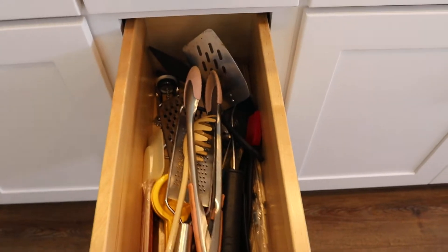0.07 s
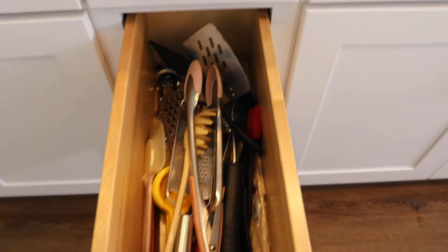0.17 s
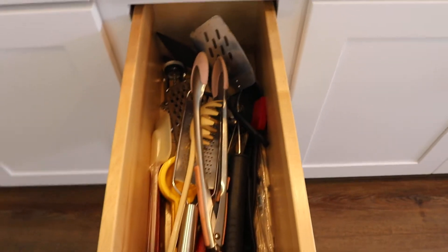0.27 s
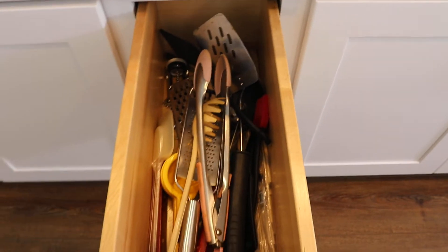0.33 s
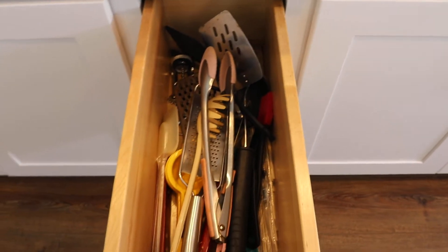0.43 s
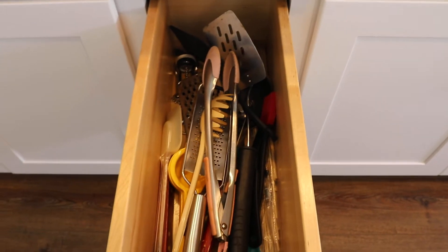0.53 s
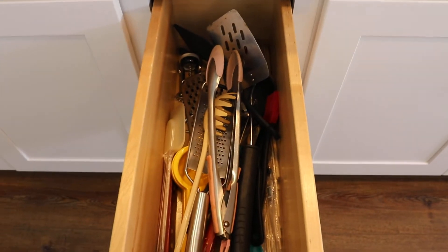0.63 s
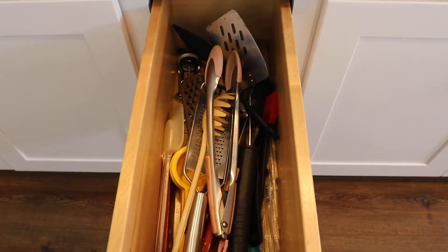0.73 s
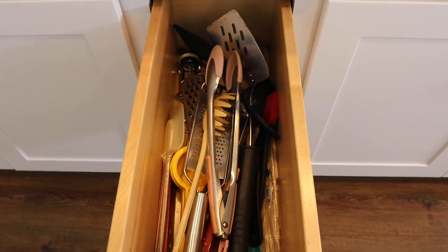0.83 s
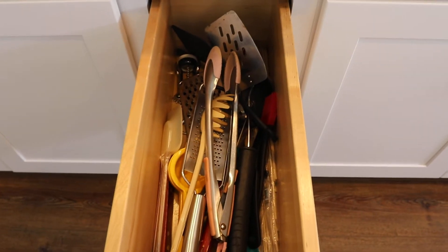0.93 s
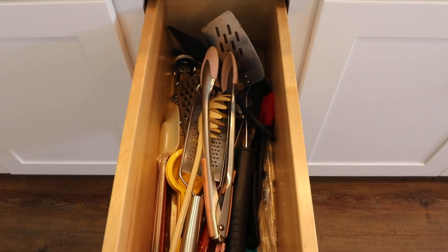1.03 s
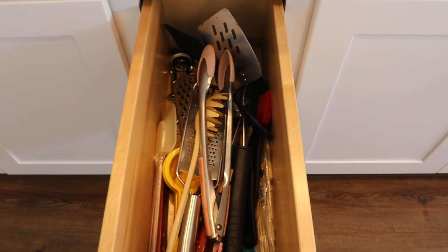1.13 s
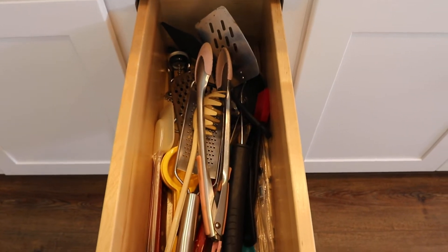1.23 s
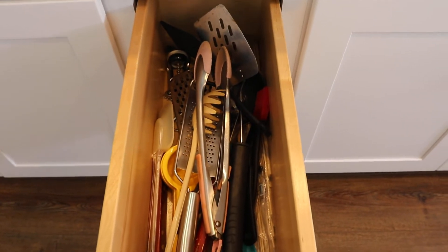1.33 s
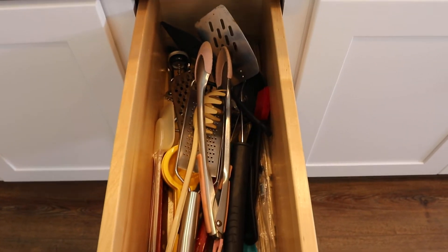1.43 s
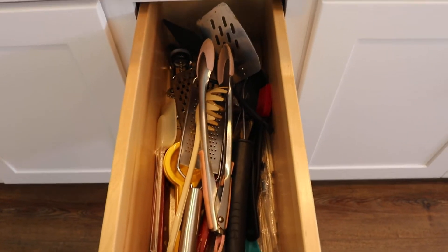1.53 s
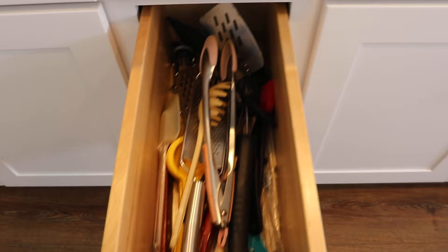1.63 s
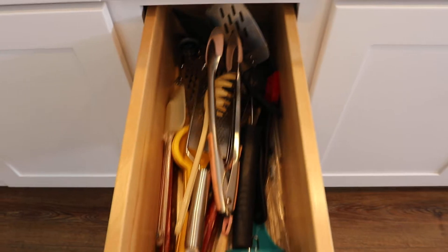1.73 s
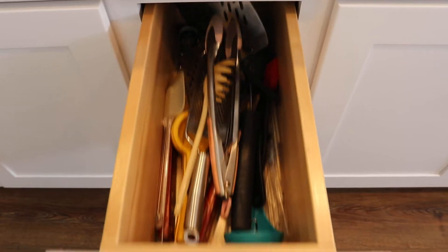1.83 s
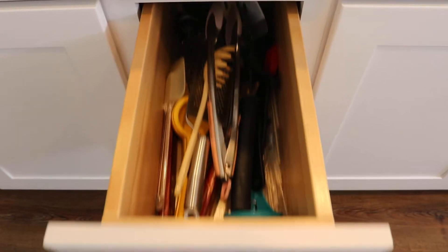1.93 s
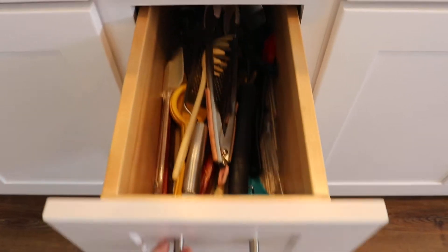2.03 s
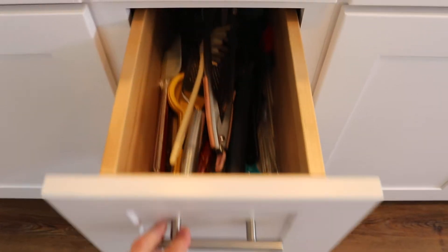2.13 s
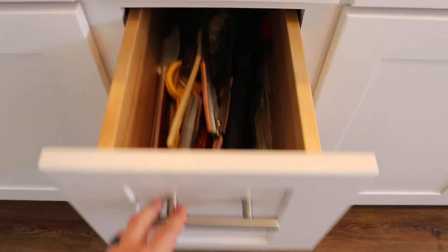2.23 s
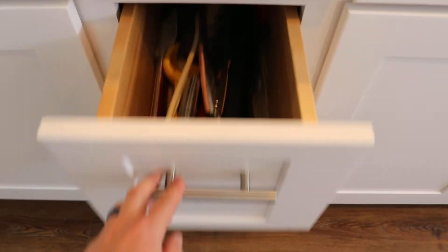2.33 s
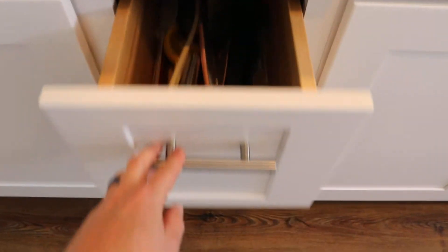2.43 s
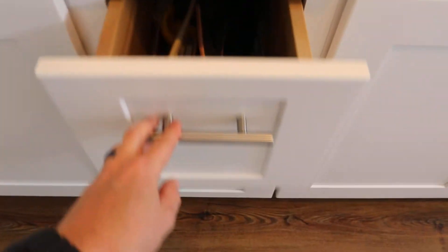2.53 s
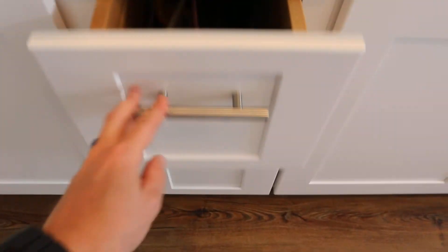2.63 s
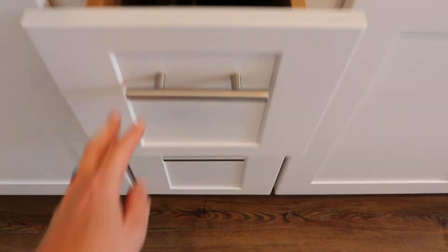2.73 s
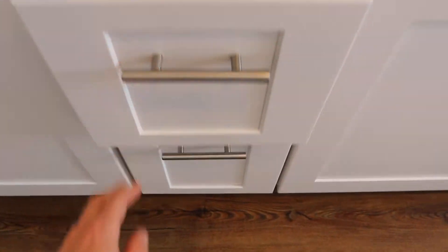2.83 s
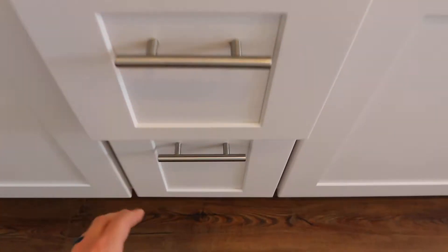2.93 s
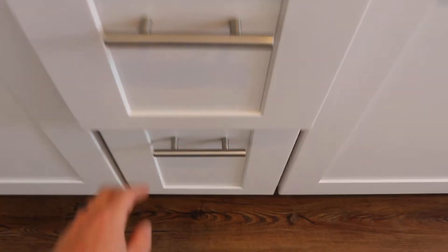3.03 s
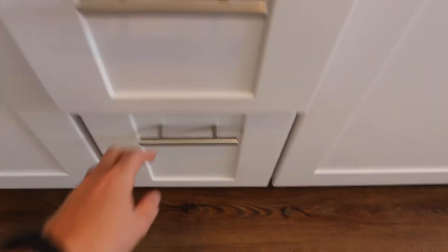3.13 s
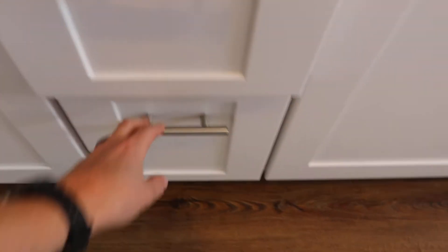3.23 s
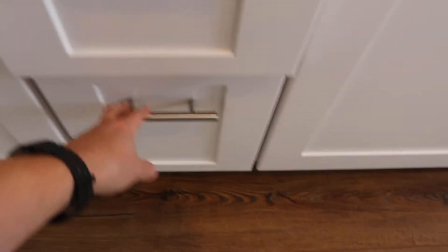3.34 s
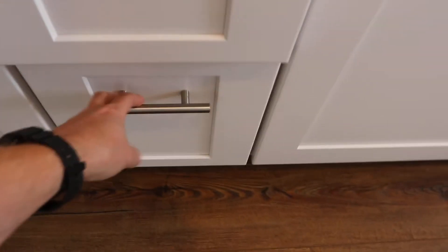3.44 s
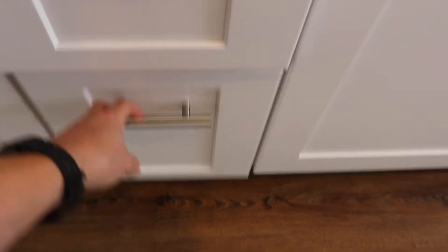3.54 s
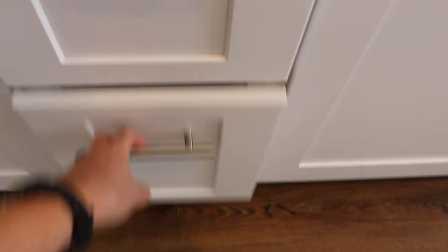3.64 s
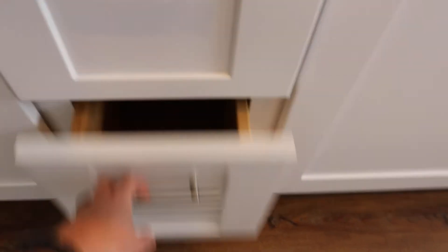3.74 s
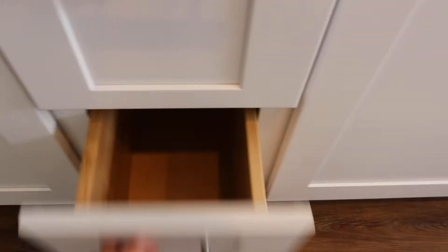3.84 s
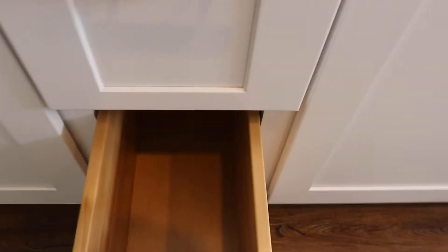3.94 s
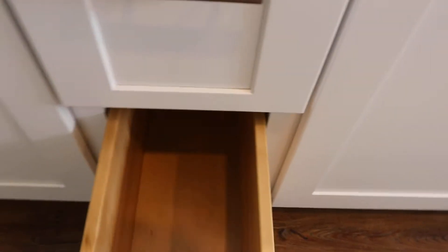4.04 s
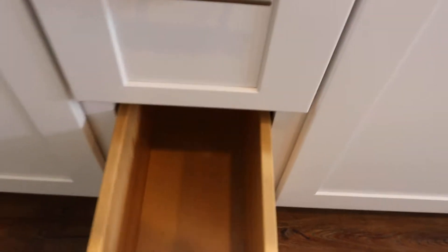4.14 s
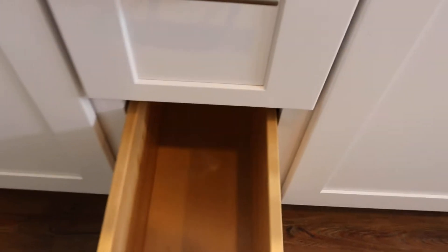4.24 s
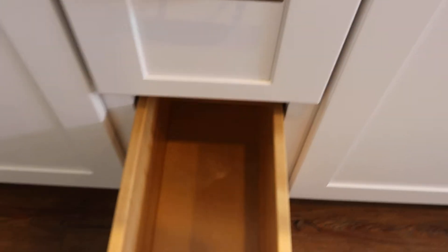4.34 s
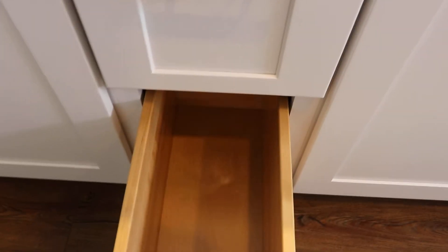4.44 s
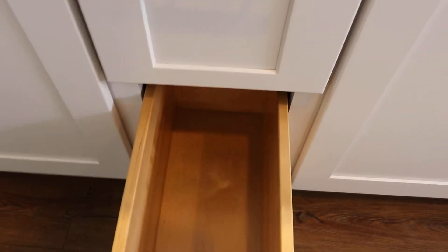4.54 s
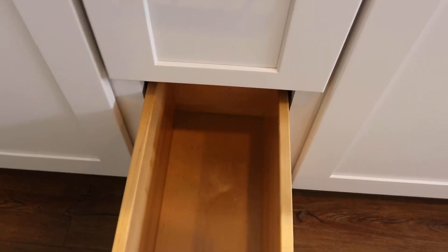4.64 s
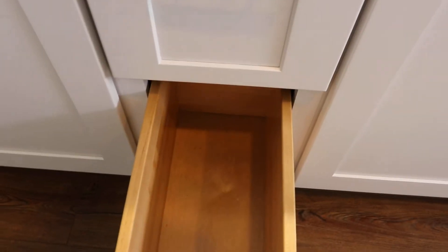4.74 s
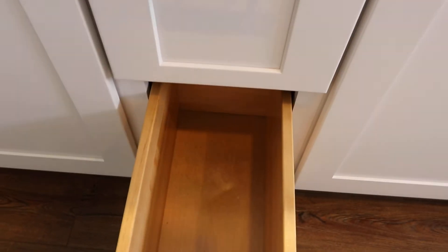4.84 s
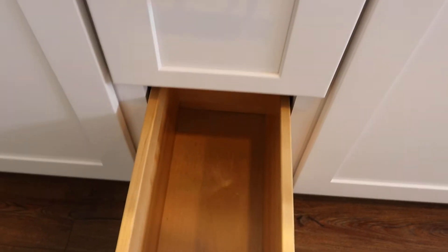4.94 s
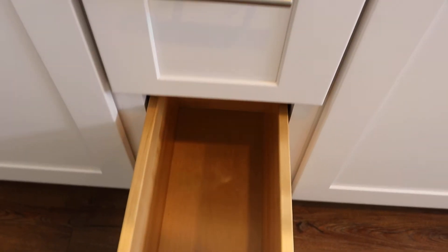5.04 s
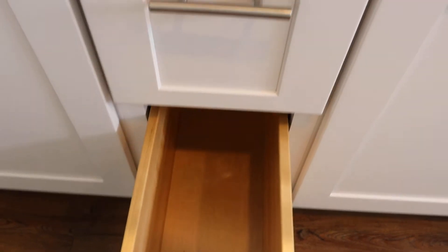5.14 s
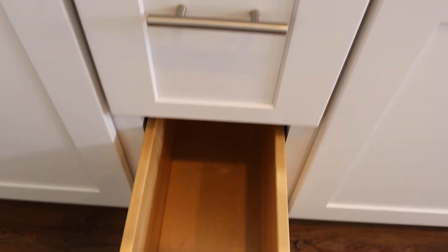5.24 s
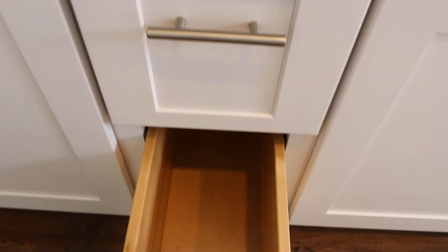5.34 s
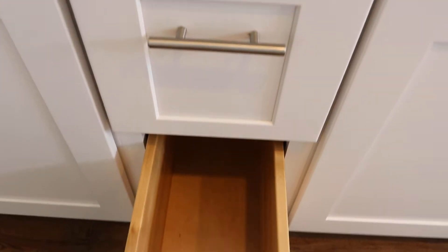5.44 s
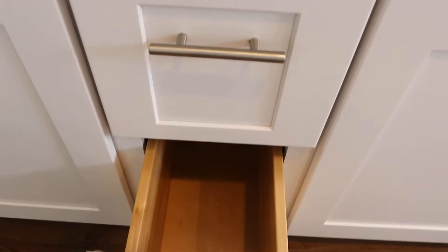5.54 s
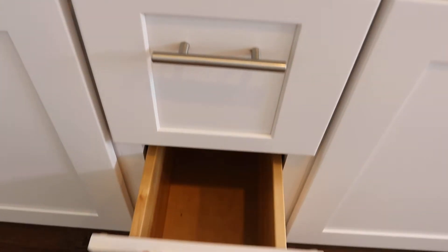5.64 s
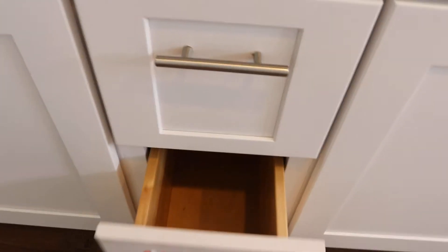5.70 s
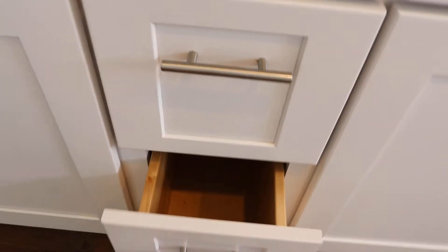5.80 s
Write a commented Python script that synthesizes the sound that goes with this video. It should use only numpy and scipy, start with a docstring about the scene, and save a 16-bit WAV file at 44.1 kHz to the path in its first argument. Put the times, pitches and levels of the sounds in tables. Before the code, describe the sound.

A quiet kitchen with low room tone, faint fridge and motor hum, soft microphone hiss and slight handling rumble, stronger on the left. At about 0.55-0.8 s, a cluster of small dull taps on wood. From around 1.5 s a full utensil drawer starts rolling on ball runners; from 1.9 to 2.3 s it rattles, with light metallic clinks, then glides more softly and latches with a sharp, dry click near 2.97 s. The fridge hum thins out here. Tiny hard ticks of hand and handle follow at 3.1-3.5 s, with a small low thud. At 3.6 s the empty lower drawer is pulled quickly: louder, hollow rumble and bright rail hiss, clacking at 3.75 s and peaking at 3.9-4.05 s with deep thuds at the stop. Boxy resonance and faint ticks fade by 4.8 s. From 5 s it rolls back, with boomy swells around 5.25 and 5.4 s, softening toward the end.

```python
"""Two wooden kitchen drawers roll on steel ball runners. The upper one, full of utensils, is pushed shut
and latches. The empty lower one is pulled out, bumps its stop and is pushed back. Random knocks of balls on
a rough track shake the wood and make the rails rattle and hiss. Small parts click as short bursts through
resonances; short low tones add a few deep thuds and brief swells of the box boom. Behind them a fridge and
motor tones hum in a quiet kitchen of shaped noise, with microphone hiss and the low rumble of the hand."""
import sys
import numpy as np
from scipy import signal
from scipy.fft import rfft, irfft
from scipy.io import wavfile
from scipy.ndimage import uniform_filter1d

SR = 44100
rng = np.random.default_rng(int(sys.argv[2]) if len(sys.argv) > 2 else 0)


def master_out(mix):
    """Clip the mix to full scale and print it as 16-bit PCM to the path in sys.argv[1]."""
    frames = np.transpose(np.atleast_2d(mix))
    ceiling = np.clip(frames, -1, 1)
    pcm = np.round(ceiling * 32767).astype(np.int16)
    wavfile.write(sys.argv[1], SR, pcm)


N = 258854

# How each drawer rolls. Each row: time in seconds, then levels in dB of the box boom, rail noise, treble hiss.
UPPER_ROLL = [(1.3, -56.5, -69, -72), (1.51, -45.5, -55, -66), (1.76, -38, -43, -59),
              (1.88, -27.5, -41.5, -62), (2.04, -31, -37.5, -51), (2.15, -35, -50, -63),
              (2.4, -38, -49.5, -55.5), (2.56, -40.5, -45, -50), (2.75, -42, -50.5, -56),
              (2.86, -43, -53, -59), (2.97, -32.5, -54.5, -58.5), (3.15, -47, -55.5, -56),
              (3.4, -42.5, -57, -56.5), (3.56, -41.5, -48, -59)]
LOWER_ROLL = [(3.56, -52, -53, -60), (3.66, -38.5, -41.5, -56), (3.74, -31.5, -36.5, -48),
              (3.8, -21.5, -31.5, -55), (3.89, -23, -29, -40.5), (3.93, -21.5, -25.5, -35),
              (3.99, -23, -40, -45), (4.03, -17.5, -38.5, -48), (4.1, -26, -38.5, -49),
              (4.22, -26, -48.5, -56.5), (4.47, -29, -55, -62), (4.61, -36, -67, -64),
              (4.81, -48, -65, -75), (4.92, -44.5, -56, -65), (4.99, -28.5, -47.5, -61),
              (5.13, -28, -39.5, -60), (5.2, -29.5, -42, -57), (5.26, -19, -39, -61),
              (5.34, -25.5, -36, -58), (5.41, -17, -39.5, -62), (5.46, -24.5, -48.5, -60),
              (5.55, -33.5, -44.5, -59), (5.69, -32, -48.5, -63), (5.87, -36, -60.5, -68)]
# Resonances of the drawers' parts. Each row: pitch in Hz, width in Hz, level in dB next to the other rows.
# Air and bottom panel of each box:
FULL_BOX_MODES = [(235, 31.6, 1.5), (250.6, 14.2, 5.5), (294.4, 8.9, 6.5)]
EMPTY_BOX_MODES = [(216, 11.4, -1.5), (244.2, 18.9, -1.5), (273.5, 11.2, -0.5)]
# Steel rails:
FULL_RAIL_MODES = [(656, 160, -6.5), (812, 110, 0.5), (928, 49, 1), (1073, 89, -4.5), (1217, 120, 2),
                   (1334, 200, -7), (1470, 74, -1.5), (1670, 300, -6.5)]
EMPTY_RAIL_MODES = [(677, 49, -4.5), (771, 43, -1.5), (820, 22, 2), (947, 23, -1), (1095, 280, -11),
                    (1227, 55, -1.5), (1316, 54, -6.5), (1478, 46, -4.5), (1682, 160, -9)]
# Cages that hold the balls:
FULL_CAGE_MODES = [(1960, 45, 7), (2323, 54, 8), (2570, 52, 5), (2820, 360, -2), (3150, 140, 2.5),
                   (3460, 350, -4.5), (4330, 570, -1.5), (4380, 1140, -4.5)]
EMPTY_CAGE_MODES = [(2040, 110, -0.5), (2320, 300, 3.5), (2486, 50, 9), (2710, 130, 4), (3230, 290, 0),
                    (3694, 160, -0.5), (4000, 260, -5), (5100, 860, -17.5)]
# Wooden panels, the cabinet and the balls, shared by both drawers:
PANEL_MODES = [(320, 35.7, -3), (371.7, 11.2, -6), (391.5, 5.5, 4.5), (445.3, 23.6, 1.5), (466.8, 43, -5.5),
               (527, 55, -11), (573, 17.5, -11.5)]
CABINET_MODES = [(77, 75, 3.5), (121.3, 4.7, 15.5), (171, 20, 3)]
BALL_MODES = [(6100, 3250, 21), (10000, 4200, 23), (13700, 4000, -15)]

# Clicks of utensils, latch, handle and runners. Each row: start in seconds, steel level in dB, wood level
# in dB over the steel, fizz in dB over the steel, seconds to fall by 60 dB, note of the struck part in Hz.
CLICK_LIST = [(1.899, -50.5, -4, 14, 0.09, 4600), (1.9962, -33, -4, -5, 0.035, 1330),
              (2.0073, -37.5, -2, -5, 0.16, 1140), (2.035, -43, -13, 0, 0.25, 1140),
              (2.0729, -34.5, 7.5, -0.5, 0.037, 3150), (2.081, -30.5, 3.5, -17, 0.052, 1050),
              (2.1593, -32.5, -11, -8, .055, 1320), (2.2142, -32, -17, -8, 0.055, 1365),
              (2.3168, -41.5, 3, 3.5, 0.054, 2820), (2.6377, -45, -12, -7, 0.11, 1110),
              (2.839, -42, 2, -18, 0.17, 1400), (2.9176, -37.5, 16, -39, 0.043, 780),
              (2.924, -44, 10, -38, 0.088, 1060), (2.9638, -32, 3.5, -13, 0.079, 1010),
              (2.9727, -23.5, -3, -36, 0.021, 1660), (2.9755, -35.5, 8, -28, 0.051, 2580),
              (3.3706, -40.5, 6.5, -11, 0.062, 1300), (3.5084, -30.5, 0.5, -14.5, 0.11, 1260),
              (3.6304, -38.5, -4, -7.5, 0.3, 1390), (3.701, -34.5, 2, -11, 0.19, 1190),
              (3.7522, -23, -3, -28, 0.057, 2230), (3.758, -22.5, -15, -34, 0.041, 1370),
              (3.8756, -37, -11, 4, 0.22, 1740), (3.91, -23.5, 5.5, 1.5, .051, 3030),
              (3.9248, -30.5, -23, 3, 0.054, 940), (4.014, -35.5, 5, -5, 0.055, 2600),
              (4.0265, -28, 3, -14.5, 0.098, 1276), (4.287, -37, -21, -20, 0.038, 3680),
              (4.3807, -33.5, -22, -11, .075, 3660), (5.3625, -40, -6, -9, 0.076, 3680),
              (5.3804, -41, 0, -1, 0.23, 2650), (5.4021, -42, -4, -8, 0.088, 2530)]
# Resonances of wood, steel and thin steel in a click. Each row: pitch in Hz, width in Hz, level in dB.
CLICK_WOOD_MODES = [(773, 174, 0), (986, 114, 4), (1034, 51, 7), (1344, 180, 1.5)]
CLICK_STEEL_MODES = [(1720, 230, 2), (2187, 200, 9.1), (2490, 370, 0.55), (2465, 197, 10.4),
                     (2520, 370, 2.4)]
THIN_STEEL_MODES = [(2910, 73, 6.5), (3630, 125, 5.5), (4250, 440, -4.5), (5150, 690, -1),
                    (6100, 1800, -13)]

# Single dry contacts, soft taps on wood first, then needle-sharp ticks.
# Each row: start in seconds, edge level in dB, wood level in dB, seconds for the wood to fall by 60 dB.
TICK_LIST = [(.553, -40.5, -27.5, 0.2), (0.589, -46, -31, 0.1), (0.653, -46, -25.5, 0.17),
             (.669, -54, -28.5, .06), (.680, -46, -28, 0.094), (0.7521, -42, -24.5, 0.091),
             (.770, -52, -38, 0.053), (.782, -48, -29, 0.099), (3.1423, -27.5, -26.5, 0.033),
             (3.321, -33, -29, .03), (3.364, -36, -31, .02), (3.4532, -28.5, -27, 0.028)]
# Resonances of the hard edge and the wood under it. Each row: pitch in Hz, width in Hz, level in dB.
TICK_EDGE_MODES = [(1920, 1400, 1), (3160, 1350, 7), (4950, 3700, -9.5), (9000, 3600, -13)]
TICK_WOOD_MODES = [(580, 320, 8.5), (850, 240, 13), (1040, 520, 4), (1710, 700, -6.5)]

# Short low tones: a few deep thuds, and brief swells of the box boom.
# Each row: start in seconds, pitch in Hz, level in dB before the swell-in, seconds to fall by 60 dB.
LOW_TONE_LIST = [(3.383, 226, -26.5, 0.25), (3.385, 81, -35, 0.18), (3.91, 80, -23.5, 0.4),
                 (4.027, 73.4, -24.5, 0.33), (4.224, 259, -9.5, 0.098), (4.122, 251, -5, 0.089),
                 (4.44, 59.7, -29.5, 0.14), (5.407, 265, -27, 0.06)]

# Colour of the hand's rumble, the room tone and the microphone hiss.
# Each row: pitch in Hz, strength in dB next to the other rows.
GRIP_COLOUR = [(15, -18), (28, 2), (50, -14), (85, -6), (200, -60)]
KITCHEN_COLOUR = [(8.8, -45), (15, 9), (49, -16), (165, -2), (259, -6), (307, -13.5), (364, -2), (414, -1),
                  (583, -12), (1230, -16), (2500, -32), (3250, -54), (5500, -120)]
HISS_COLOUR = [(600, -32), (1500, -2.5), (2500, -3), (3500, -2.5), (5000, -9.5), (7000, -6), (10000, -6),
               (12500, -12), (15700, -17)]
# Tones of the fridge. Each row: pitch in Hz, width in Hz, level in dB before the fade below.
FRIDGE_TONES = [(185, 7.9, -50.5), (228, 5.7, -52.5), (317.3, 5.4, -42.5), (527, 3.5, -57.5),
                (7460, 25, -78)]
# The fridge drops as the microphone moves away, then comes back. Each row: time in seconds, change in dB.
FRIDGE_FADE_DB = [(0, -2.5), (1.6, -1), (2.6, -23), (5.87, -6)]
# Wandering motor tones. Each row: pitch in Hz, typical wander in Hz, level in dB before its slow swell.
MOTOR_TONES = [(58.4, 2.45, -55), (116.8, 1.01, -53.5), (417, 1.64, -53)]

# How alike left and right are, for near sounds and for the room.
# Each row: pitch in Hz, likeness from 0 (unrelated) to 1 (the same).
NEAR_ALIKE = [(20, 0.69), (100, 1), (290, .99), (640, 0.94), (1400, 0.52), (3100, 0.42), (6800, 0.15),
              (15000, 0)]
ROOM_ALIKE = [(20, 0.85), (45, 1), (130, 0.94), (290, 1), (640, 0.65), (1400, 0.29), (3100, 0), (15000, 0)]
# Left-right balance. Each row: pitch in Hz, left minus right in dB.
STEREO_LEAN = [(60, 0), (110, 1.5), (200, -0.5), (380, 0.5), (700, 0.0), (1290, -2.0), (2380, -3.5),
               (4400, -1.5), (8120, -1.0), (15000, -2.0)]

# Share of the box's dB swing that the other wooden parts follow.
PANEL_FROM_BOX, CABINET_FROM_BOX = 0.41, 0.55
# Size of the random swells in dB, and how many averaging spans fit in a second.
UNEVEN_DB, UNEVEN_PER_S = 0.76, 19
# The struck part's note: level in dB over the steel, and pitch divided by width.
NOTE_DB, NOTE_Q = -1, 26
# Thin steel rings more in the fizzier clicks: its share of the fizz dB.
THIN_FROM_FIZZ = 0.77


def drawer(roll, panel_offset_db, cabinet_offset_db, cage_offset_db, box, rails, cage):
    """Rolling grit shakes the box, the rails and the balls themselves."""
    boom_db, rail_db, ball_db = on_time(roll)
    panel_db = panel_offset_db + PANEL_FROM_BOX * boom_db + (1 - PANEL_FROM_BOX) * rail_db
    cabinet_db = cabinet_offset_db + CABINET_FROM_BOX * boom_db
    cage_db = rail_db + cage_offset_db
    # Fade in and out over 14 ms at the two ends of the movement.
    t = np.arange(N) / SR
    since_start = t - roll[0][0] + 0.0055
    until_end = roll[-1][0] + 0.015 - t
    moving = np.clip(np.minimum(since_start, until_end) / 0.014, 0, 1)
    coarse = grit(rate_hz=120.0, spread_db=0.38, tail_s=0.012)
    fine = grit(rate_hz=340.0, spread_db=2.6, tail_s=0.053)
    wood = undb(boom_db + uneven()) * ring(coarse, box)
    wood += undb(panel_db + uneven()) * ring(coarse, PANEL_MODES)
    wood += undb(cabinet_db + uneven()) * ring(coarse, CABINET_MODES)
    steel = undb(rail_db) * ring(fine, rails)
    steel += undb(cage_db + uneven()) * ring(fine, cage)
    steel += undb(ball_db) * ring(fine, BALL_MODES)
    return moving * (wood + steel)


def grit(rate_hz, spread_db, tail_s):
    """Force of balls crossing pits in the track: random uneven knocks, each smeared by a short tail."""
    hit = rng.random(N) < rate_hz / SR
    knocks = hit * undb(spread_db * rng.exponential(size=N))
    # The tail smears the power of the knocks; its root is the strength of the noise.
    power = signal.lfilter([1], [1, -np.exp(-1 / (tail_s * SR))], knocks ** 2)
    return unit(np.sqrt(power) * noise())


def uneven():
    """A random swell in dB, so that a part grows louder and softer on its own."""
    span = int(SR / UNEVEN_PER_S)
    smooth = uniform_filter1d(rng.standard_normal(N), size=span)
    return UNEVEN_DB * unit(uniform_filter1d(smooth, size=span))


def clicks():
    """Each click is one blow and a quick chatter of contacts that dies away in wood, steel and air."""
    wood, steel, thin_steel, fizz = np.zeros((4, 2, N))
    notes = np.zeros((2, N))
    chatter = noise()
    t = np.arange(int(0.3 * SR)) / SR
    room_tail = undb(-21 - 60 * t / 0.31)
    for start_s, steel_db, wood_db, fizz_db, t60, note_hz in CLICK_LIST:
        now = slice(int(start_s * SR), int(start_s * SR) + len(t))
        push = (undb(-60 * t / t60) + room_tail) * chatter[:, now]
        push[0, 0] += 6.0  # the first contact
        wood[:, now] += undb(steel_db + wood_db) * push
        steel[:, now] += undb(steel_db) * push
        thin_steel[:, now] += undb(steel_db + THIN_FROM_FIZZ * fizz_db) * push
        fizz[:, now] += undb(steel_db + fizz_db) * push
        note = ring(push, [(note_hz, note_hz / NOTE_Q, 0)])
        notes[:, now] += undb(steel_db + NOTE_DB) * note
    body = ring(wood, CLICK_WOOD_MODES) + ring(steel, CLICK_STEEL_MODES)
    treble = ring(thin_steel, THIN_STEEL_MODES) + ring(fizz, BALL_MODES)
    return notes + body + treble


def ticks():
    """A hard edge gives a very short rustle; the wood under it rattles on a little longer."""
    hard, wood = np.zeros((2, 2, N))
    t = np.arange(int(0.12 * SR)) / SR
    for start_s, edge_db, wood_db, t60 in TICK_LIST:
        now = slice(int(start_s * SR), int(start_s * SR) + len(t))
        rustle = 0.45 * rng.standard_normal((2, len(t)))
        rustle[:, 0] = 6.0, 2.5  # the first contact: common part, differing part
        hard[:, now] += undb(edge_db - 60 * t / 0.019) * rustle
        wood[:, now] += undb(wood_db - 60 * t / t60) * rustle
    return ring(hard, TICK_EDGE_MODES) + ring(wood, TICK_WOOD_MODES)


def low_tones():
    """Deep thuds and brief swells of the box boom: each low tone swells over a few ms and fades."""
    out = np.zeros((2, N))
    for start_s, hz, db, t60 in LOW_TONE_LIST:
        t = np.maximum(np.arange(N) / SR - start_s, 0)
        swell_in = 1 - np.exp(-t / 0.0065)
        out[0] += undb(db - 60 * t / t60) * swell_in * np.sin(2 * np.pi * hz * t)
    return out


def hand_rumble():
    """The hand's grip is low noise, separate on each side and stronger on the left."""
    return coloured(GRIP_COLOUR, -62.5) * undb([[3.0], [-3.0]])


def kitchen():
    """Steady room tone and microphone hiss are shaped noise; motor tones and the fridge hum with them."""
    room_tone = coloured(KITCHEN_COLOUR, -43.5)
    hiss = coloured(HISS_COLOUR, -58.5)
    return room_tone + hiss + motor_hum() + fridge()


def fridge():
    """The fridge drones on narrow wavering tones, with a slow change of level."""
    return undb(on_time(FRIDGE_FADE_DB)[0]) * narrow_tones(FRIDGE_TONES)


def motor_hum():
    """Motor tones are sine waves whose pitch and level wander slowly."""
    out = np.zeros((2, N))
    for hz, wander_hz, db in MOTOR_TONES:
        drift, swell = (unit(uniform_filter1d(row, size=SR // 6)) for row in noise())
        turns = np.cumsum(hz + wander_hz * drift) / SR
        out[0] += np.sqrt(2) * undb(db + 1.8 * swell) * np.sin(2 * np.pi * turns)
    return out


def narrow_tones(tones):
    """Noise through very narrow resonances becomes wavering tones."""
    return sum(undb(db) * ring(noise(), [(hz, width, 0)]) for hz, width, db in tones)


def coloured(colour, db):
    """Steady noise is given its colour by scaling each frequency, then set to a level in dB."""
    shaped = irfft(rfft(noise()) * undb(on_hz(colour)), N)
    return unit(shaped) * undb(db)


def noise():
    """Two unrelated noises, for the common and the differing part of the stereo picture."""
    return rng.standard_normal((2, N))


def ring(x, modes):
    """Resonances ring when x strikes them; white noise of average strength 1 comes out near 1."""
    out, power = 0, 0
    for k, (hz, width, db) in enumerate(modes):
        b, a = signal.iirpeak(hz, hz / width, fs=SR)
        sign = (-1) ** k
        out = out + sign * undb(db) * signal.lfilter(b, a, x)
        power += undb(db) ** 2 * np.pi * width / SR
    return out / np.sqrt(power)


def ports(pair, alike):
    """Two close microphone ports share sound to a degree set for each pitch, mostly in the bass."""
    common, apart = rfft(pair)
    like = np.clip(on_hz(alike), 0, 1)
    lean_db = on_hz(STEREO_LEAN)
    mid, side = common * np.sqrt(1 + like), apart * np.sqrt(1 - like)
    left = (mid + side) * undb(lean_db / 2)
    right = (mid - side) * undb(-lean_db / 2)
    return irfft(np.array([left, right]), N) / np.sqrt(2)


def undb(db):
    """Turn dB into a plain gain."""
    return 10 ** (np.asarray(db) / 20)


def unit(x):
    """Scale to an average strength (rms) of 1."""
    return x / np.sqrt(np.mean(x ** 2))


def on_hz(table):
    """Read a table of pitch and value at every frequency, evenly in log pitch."""
    hz, value = np.transpose(table)
    every_hz = np.arange(N // 2 + 1) * SR / N
    return np.interp(np.log(every_hz + 1), np.log(hz), value)


def on_time(table):
    """Read the columns of a table, whose first column is seconds, at every sample."""
    seconds, *columns = np.transpose(table)
    return [np.interp(np.arange(N) / SR, seconds, column) for column in columns]


def scene():
    """Both drawers and their small noises are close, the kitchen all around, the hand on each port."""
    upper = drawer(UPPER_ROLL, panel_offset_db=0.61, cabinet_offset_db=-27, cage_offset_db=-3,
                   box=FULL_BOX_MODES, rails=FULL_RAIL_MODES, cage=FULL_CAGE_MODES)
    lower = drawer(LOWER_ROLL, panel_offset_db=8.32, cabinet_offset_db=-32, cage_offset_db=-6,
                   box=EMPTY_BOX_MODES, rails=EMPTY_RAIL_MODES, cage=EMPTY_CAGE_MODES)
    near = upper + lower + clicks() + ticks() + low_tones()
    return ports(near, NEAR_ALIKE) + ports(kitchen(), ROOM_ALIKE) + hand_rumble()


def record(dry):
    """The microphone drops the deepest bass and the recorder cuts the top."""
    bass_cut = signal.butter(2, 24.0, "high", fs=SR, output="sos")
    top_cut = signal.ellip(16, 0.2, 90, 15800, fs=SR, output="sos")
    return signal.sosfilt(top_cut, signal.sosfilt(bass_cut, dry))


dry = scene()
out = record(dry)
master_out(out)
```